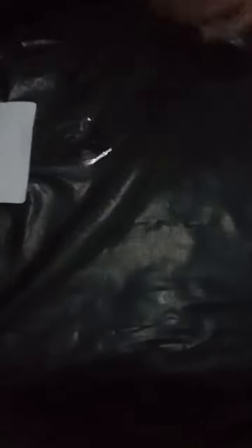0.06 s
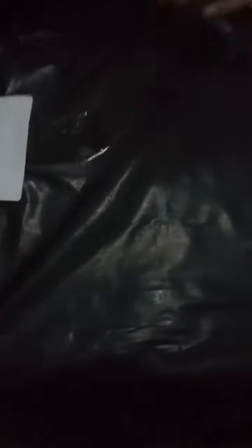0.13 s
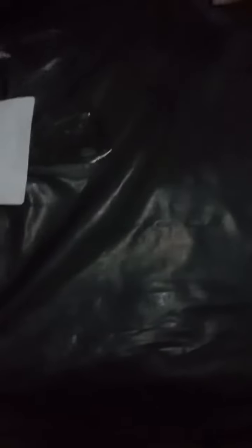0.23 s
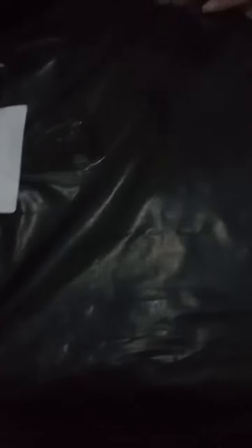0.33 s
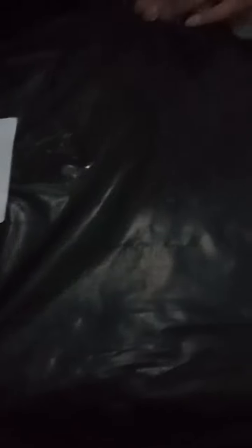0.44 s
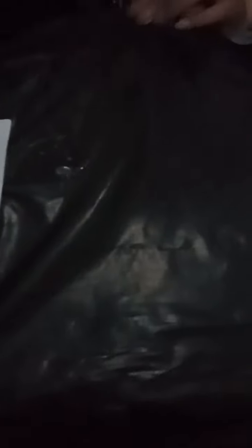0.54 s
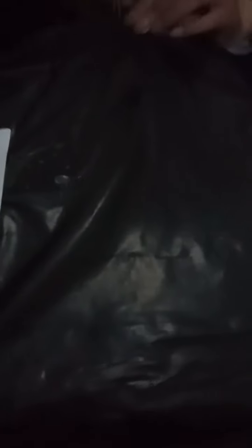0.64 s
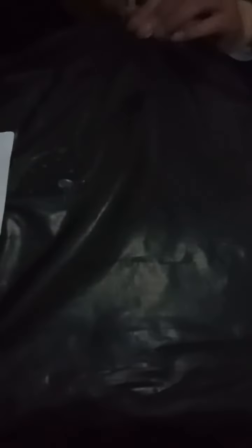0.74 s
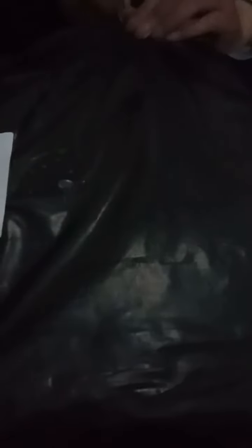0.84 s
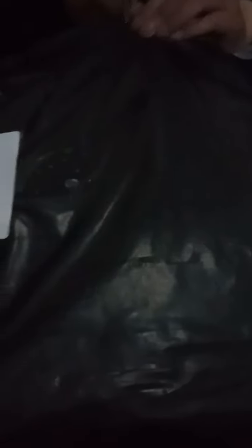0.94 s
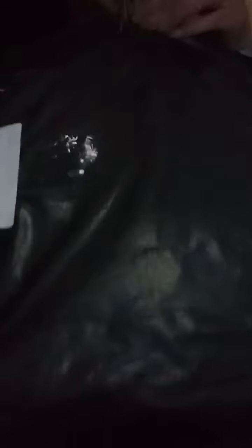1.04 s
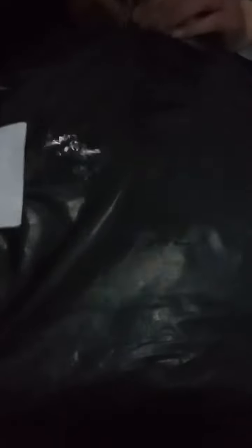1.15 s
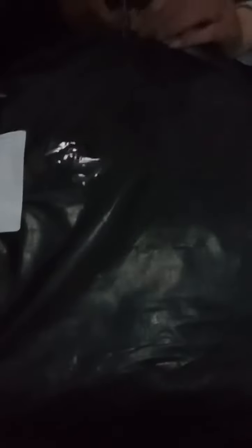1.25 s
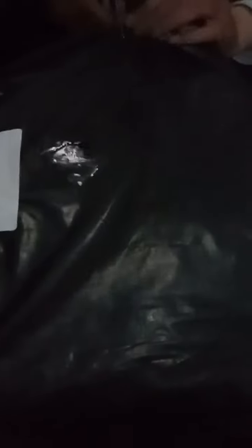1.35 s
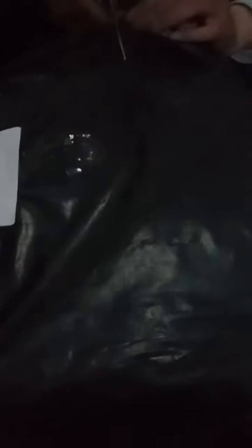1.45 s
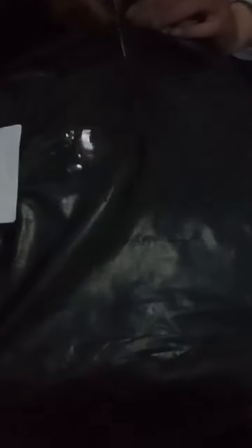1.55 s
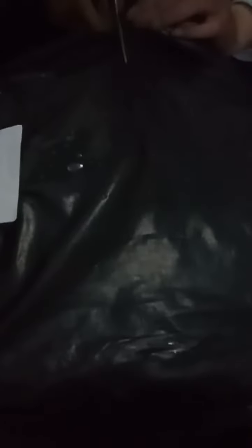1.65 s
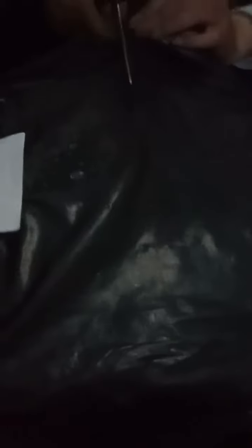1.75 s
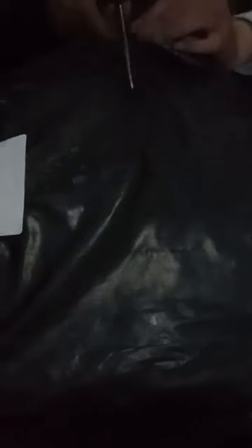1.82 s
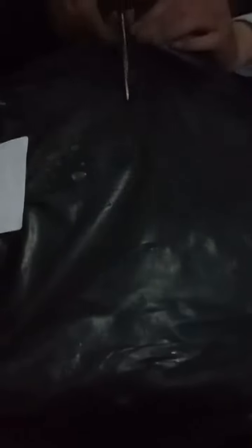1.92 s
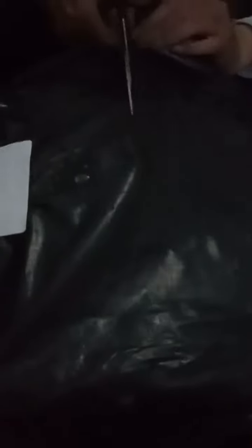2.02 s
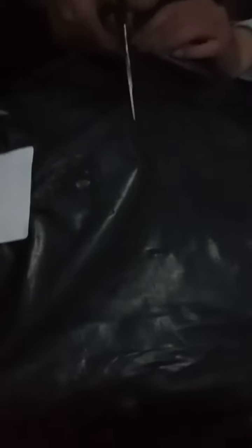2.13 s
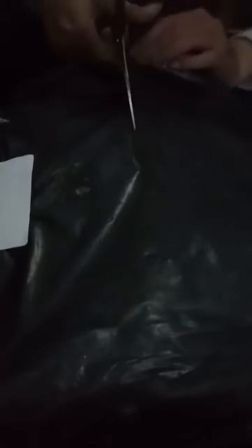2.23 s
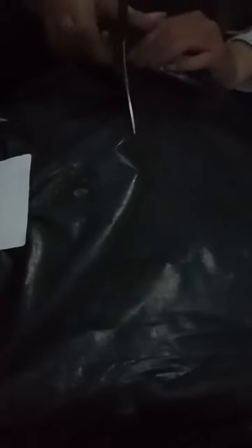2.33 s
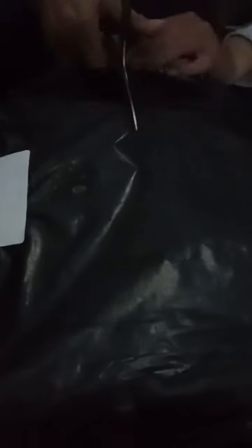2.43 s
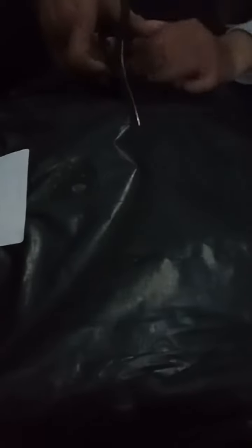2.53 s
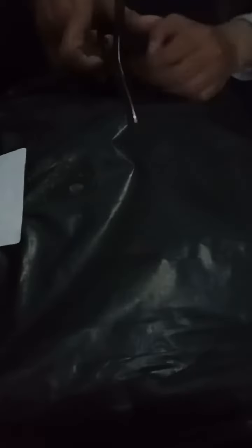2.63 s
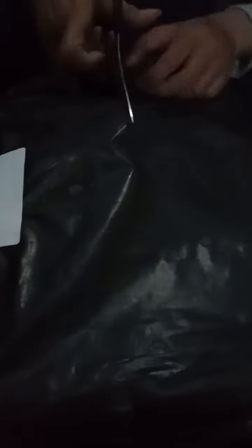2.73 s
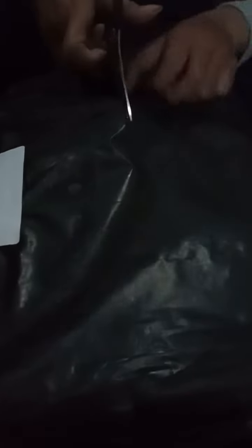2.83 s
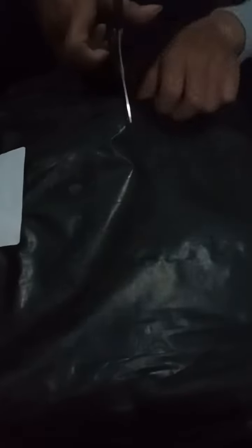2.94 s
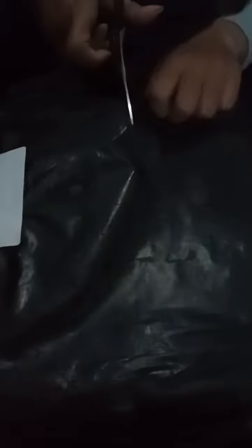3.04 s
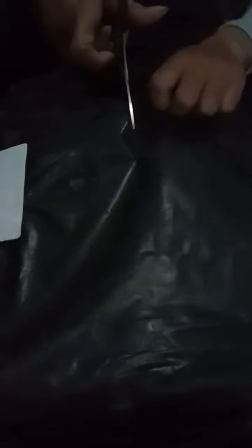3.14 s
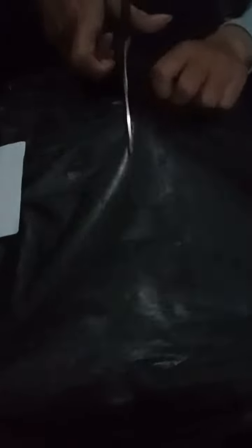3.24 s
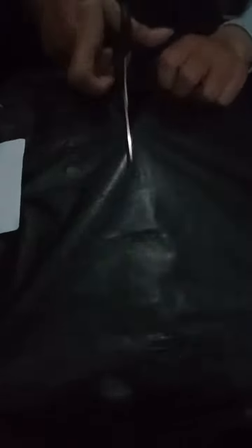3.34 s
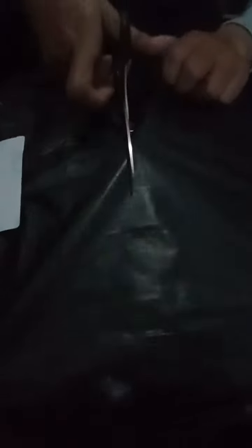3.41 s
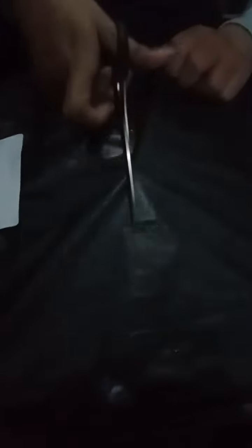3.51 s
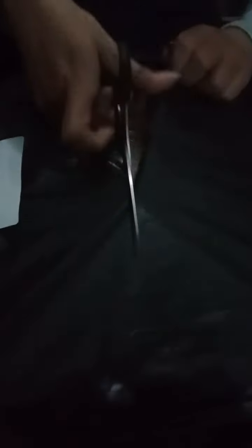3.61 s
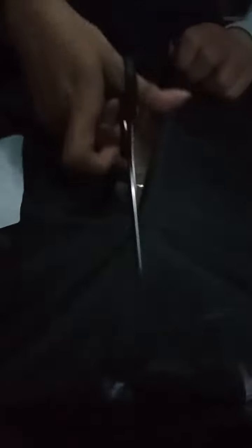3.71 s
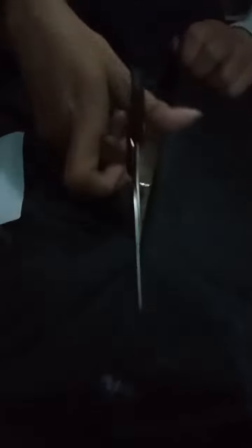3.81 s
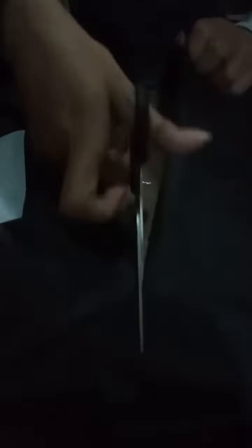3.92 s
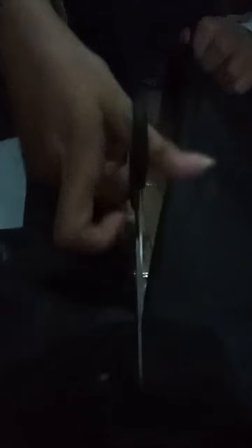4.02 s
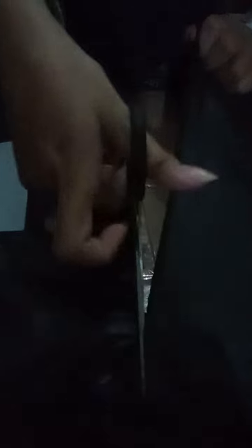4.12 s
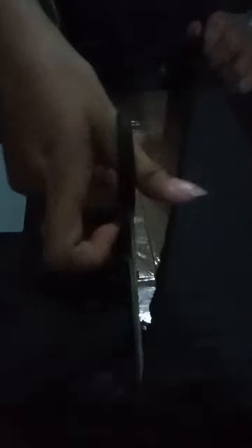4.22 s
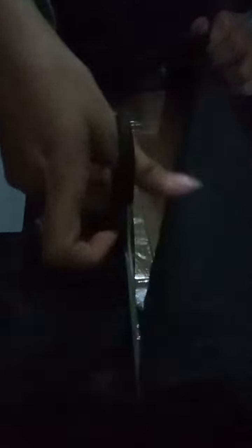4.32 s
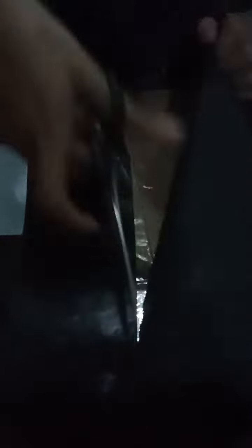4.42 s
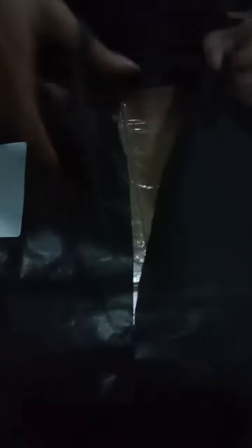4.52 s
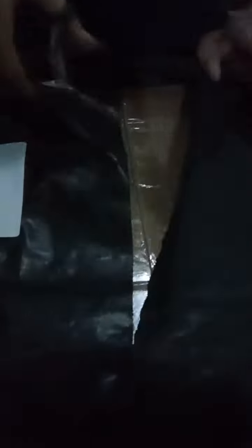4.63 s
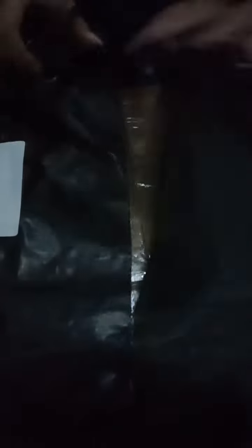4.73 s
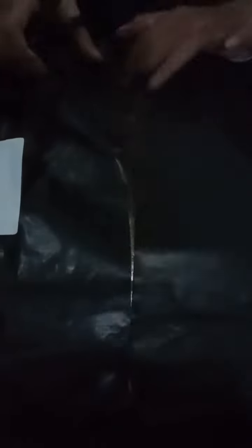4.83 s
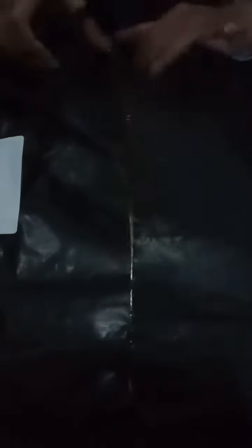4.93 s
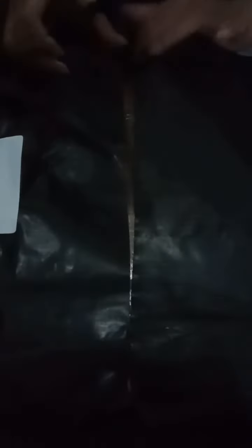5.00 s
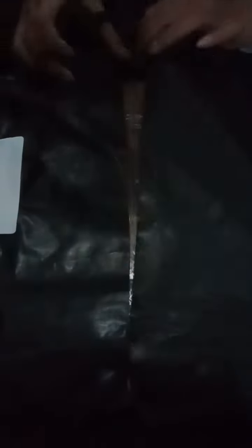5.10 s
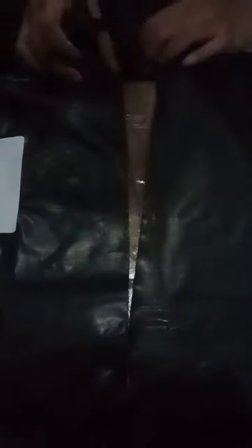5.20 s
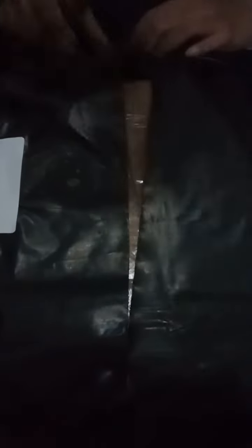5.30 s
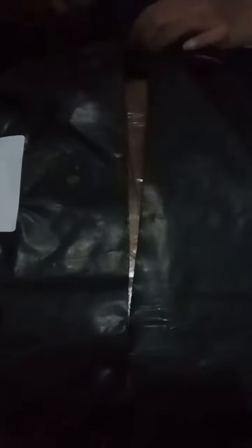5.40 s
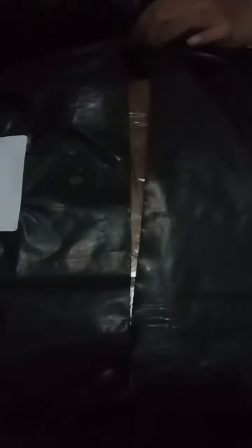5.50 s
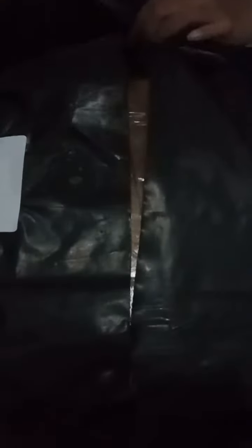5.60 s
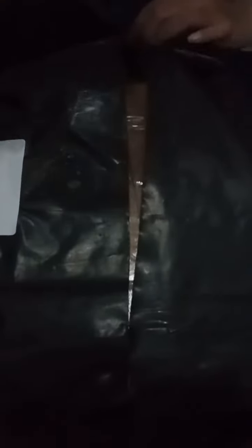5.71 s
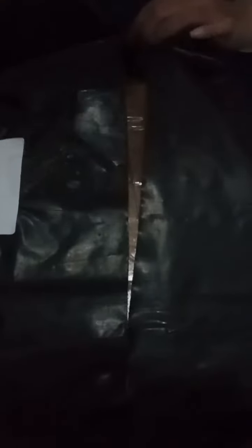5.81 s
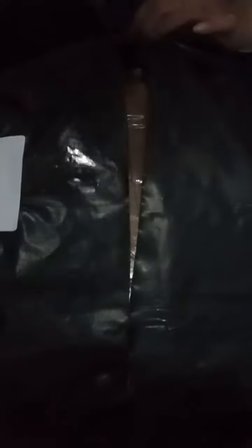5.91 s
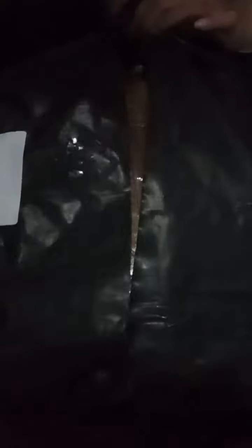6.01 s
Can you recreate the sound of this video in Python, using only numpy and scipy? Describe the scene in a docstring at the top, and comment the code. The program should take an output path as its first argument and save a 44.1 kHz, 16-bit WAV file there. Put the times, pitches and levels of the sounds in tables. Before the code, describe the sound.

Scissors snip and slice through a thin plastic mailer bag, which crinkles and crackles close up in a quiet room.

```python
"""A thin plastic mailer bag crinkles as scissors cut it open, close up in a quiet room.
A few short snips start the cut, the blades zip through the taut film, and the hands pull the slit apart.
Tiny buckles make the crinkle, big creases snap, and the film creaks as it sticks and slips on the blade.
Underneath, panels flex and knock, the parcel rings hollow and the whole bag heaves."""
import sys
import numpy as np
from scipy import signal
from scipy.fft import rfft, irfft
from scipy.io import wavfile
from scipy.ndimage import uniform_filter1d

SR = 44100
rng = np.random.default_rng(int(sys.argv[2]) if len(sys.argv) > 2 else 0)


def unload_audio(sound):
    """Save the sound as a 16-bit wav file, at the path given as the first command line argument."""
    columns = np.transpose(np.atleast_2d(sound))
    # keep every value between -1 and 1, then stretch to whole-number steps
    steps = np.round(np.clip(columns, -1, 1) * 32767)
    wavfile.write(sys.argv[1], SR, steps.astype(np.int16))


N = 267025

# Levels in the tables are set ahead of the faders in scene().
# Pushes, snips and tugs. Each row: start and end in seconds, first and last level in dB, tautness
# (brightness) in dB, then panel flex and bag heave in dB against that level.
STROKES = [(0.0, 0.022, -44.5, -43, 8, -23, -23), (0.037, 0.12, -56.5, -65, 10, -33, -19),
           (0.116, 0.285, -49.5, -42, 1.5, -11, -29), (0.318, 0.442, -58.5, -59.5, 3, -26, -25.5),
           (0.453, 0.567, -48.5, -49, 1, -27, -27.5), (0.575, 0.968, -58, -76.5, 8, -21, -22.5),
           (1.10, 1.195, -35, -34.5, 10, -14, -26), (1.234, 1.313, -53, -58, 4, -11, -26.5),
           (1.438, 1.488, -33.5, -35, 5.5, -10, -24.5), (1.629, 1.82, -61.5, -45, 12.5, -28.5, -30),
           (1.843, 1.9, -41.5, -42.5, 12, -28, -24), (1.934, 2.021, -38.5, -39, 12, -17.5, -28),
           (2.048, 2.119, -40.5, -39, 5.5, -11, -15.5), (2.165, 2.288, -51.5, -58.5, -1, -16.5, -26),
           (2.39, 2.46, -51.5, -41, 4.5, -9, -21), (2.486, 2.513, -35.5, -34.5, 8.5, -19, -31),
           (2.543, 2.701, -33.5, -42, 11.5, -21.5, -26), (2.73, 2.93, -57, -64.5, 8, -26, -23),
           (2.905, 2.976, -46.5, -36, 9.5, -27.5, -23.5), (3.001, 3.12, -47.5, -48.5, 6, -23, -27),
           (3.7, 3.757, -32.5, -29, 13.5, -21.5, -31), (3.776, 3.979, -39.5, -28.5, 9, -13, -26),
           (3.995, 4.09, -32.5, -33, 5.5, -5.5, -9), (4.109, 4.153, -46, -44.5, -0.5, -5, -17),
           (4.187, 4.191, -19.5, -23.5, 7.5, -8, -18), (4.206, 4.238, -36, -36.5, 4, -10.5, -14.5),
           (4.26, 4.337, -47, -43.5, 5, -22, -30), (4.352, 4.40, -35.5, -33.5, 5, -13, -23.5),
           (4.407, 4.437, -27.5, -34, 7.5, -7.5, -15), (4.46, 4.586, -32.5, -38, 7, -18.5, -37.5),
           (4.635, 4.729, -44, -45, 7, -32, -30), (4.764, 4.891, -38, -39.5, 9.5, -20.5, -26.5),
           (4.914, 5.018, -38, -40.5, 7.5, -29.5, -34), (5.045, 5.11, -63.5, -45, 6.5, -29, -31),
           (5.128, 5.215, -34, -33, 10, -14, -31), (5.235, 5.327, -37, -45.5, 6, -23, -24),
           (5.331, 5.451, -42.5, -42, 6, -24, -28), (5.821, 5.968, -56.5, -53, 20, -32.5, -30.5),
           (5.962, 6.049, -44.5, -42, 10.5, -24, -30)]
# The one long push of the blades. Each row: time in seconds, then level, tautness, flex and heave in dB.
LONG_CUT = [(3.13, -43.5, 0.5, -37, -28), (3.27, -36, 9.5, -14.5, -36.5), (3.39, -38.5, 7.5, -25, -32),
            (3.588, -31, 15.5, -25.5, -35.5), (3.692, -37, 17.5, -52, -42)]
# How freely the blades slide. Each row: time in seconds, share from 0 to 1.
GLIDE_SHARE = [(3.1, 0.03), (3.4, 0.62), (3.7, 0.13), (3.95, 0.061)]
# Tone curves of the film, its panels, the bag and the room. Each row: frequency in Hz, gain in dB.
FILM_EQ = [(600, -49), (1000, -15.5), (1230, -9), (1620, -8.5), (1850, -8.5), (2200, -6.5), (2750, -5.5),
           (3620, -3.5), (4960, -7), (6100, -5), (7020, -0.5), (8650, -5), (10200, -8.5), (11700, -16),
           (12800, -12.5), (13900, -21.5), (15300, -15), (16200, -40)]
PANEL_EQ = [(250, -12.5), (430, -3), (520, -11.5), (620, -2), (720, -1), (860, 1), (1020, -1.5),
            (1400, -14.5)]
BAG_EQ = [(25, -21), (50, -15.5), (80, -6), (110, 4), (145, 1.5), (192, 1), (250, -7), (335, -4),
          (420, -11.5), (650, -33.5)]
ROOM_EQ = [(25, -10), (130, 1), (300, -1), (800, -20.5), (1300, -10), (2000, -25.5), (7000, -2.5),
           (15000, -17)]
# The parcel's hollow ring. Each row: pitch in Hz, width of one filter pass in Hz, gain in dB.
PARCEL_MODES = [(1248, 265, -4), (1425, 117, -0.5), (2320, 58, -17), (3630, 170, -22.5), (6900, 260, -19)]
# Big creases flipping. Each row: start in seconds, attack level in dB, pitch in Hz, spread over the
# film in dB against the click.
BIG_SNAPS = [(0.1355, -37, 6850, 3.5), (0.23, -31, 6330, 15), (0.2752, -39, 5400, 10),
             (0.288, -43, 5670, 20), (0.4274, -45, 6150, -14), (0.461, -38, 6400, 2),
             (0.485, -41.5, 5900, -13), (0.5093, -41, 7900, -13), (0.5412, -35.5, 5900, -22),
             (0.55, -34, 7100, -13), (0.5685, -32, 7160, -4), (0.6296, -39, 5200, -16),
             (0.6, -43, 6900, -4), (0.703, -42, 7100, -2), (0.809, -38.5, 5200, -4),
             (0.869, -48.5, 6270, 4), (1.0826, -25.5, 5700, -32), (1.168, -28.5, 6100, -5.5),
             (1.1813, -29.5, 5700, 2), (1.1955, -25, 5750, 7), (1.2818, -42, 7200, -27),
             (1.3019, -36.5, 6130, 15), (1.3188, -43, 4060, 9), (1.4365, -34, 5530, 7),
             (1.4465, -26.5, 6430, 2), (1.4843, -31, 7460, -8), (1.496, -31.5, 6450, 1),
             (1.7768, -33.5, 7240, -9), (1.86, -30.5, 7900, -19), (1.936, -23.5, 7600, 0),
             (2.0516, -28.5, 5630, 8), (2.0958, -29.5, 4700, -3), (2.1076, -29, 5530, 5),
             (2.3823, -41, 4700, -10), (2.4921, -26.5, 7240, 23), (2.579, -30.5, 6200, 16),
             (2.7071, -29, 6630, 0), (2.767, -39, 4950, 23), (2.9693, -33, 4900, -6),
             (3.0288, -30, 4830, 8), (3.1245, -30, 6600, 10), (3.2616, -30, 6340, 0),
             (3.3467, -22, 7400, -3), (3.712, -23, 8100, -5.5), (3.7606, -18.5, 7180, -15),
             (3.7774, -25, 5450, -4), (3.8, -24.5, 5860, 27), (3.8706, -19, 4900, 13),
             (3.8908, -23.5, 6300, 12), (3.975, -22.5, 6300, -3.5), (3.9865, -22, 6100, -7),
             (3.9926, -20.5, 7200, 18), (4.0218, -21.5, 6950, 11), (4.0515, -23.5, 7300, -6),
             (4.0821, -21.5, 6600, -2), (4.1835, -27.5, 6500, 22), (4.1935, -15.5, 7300, 12.5),
             (4.278, -34, 6700, -6), (4.3358, -27.5, 6160, -1.5), (4.3562, -24.5, 3680, -9),
             (4.3677, -25, 8400, 16.5), (4.386, -24, 5550, 6), (4.4018, -20.5, 6440, -3.5),
             (4.4115, -20.5, 6100, 10), (4.429, -19.5, 6800, 16), (4.5104, -24.5, 5040, 0),
             (4.5484, -24.5, 5640, -21), (4.6654, -24.5, 7100, -27), (4.7466, -27, 6060, 33),
             (4.8719, -28.5, 6800, 3), (4.9985, -30.5, 7400, 26), (5.1446, -27.5, 4400, 11),
             (5.1879, -23, 6400, 5), (5.3753, -30.5, 6900, 6), (5.3992, -32, 5400, 19),
             (5.4347, -25.5, 5850, 6), (5.4834, -40.5, 5100, 18), (5.5249, -51, 7120, -6),
             (5.6538, -56.5, 6800, 1), (5.8257, -46.5, 5700, 0), (6.012, -29, 7850, 24)]
# Taut panels popping. Each row: start in seconds, pitch in Hz, seconds to fall 60 dB, level in dB.
PANEL_KNOCKS = [(1.0803, 209, 0.02, -36), (1.258, 615, 0.28, -71), (1.935, 145, 0.036, -40),
                (2.053, 690, 0.11, -55), (2.203, 830, 0.19, -64), (2.507, 160, 0.42, -58.5),
                (2.697, 1180, 0.057, -48), (3.435, 1437, 0.011, -31), (4.146, 662, 0.019, -33),
                (4.3377, 1496, 0.02, -32.5), (4.4146, 183, 0.047, -36.5), (4.4116, 576, 0.034, -34),
                (4.948, 1455, 0.019, -34.5), (5.436, 1480, 0.042, -40.5)]
# Film catching on the blade. Each row: start and end in seconds, first and last rate in slips per
# second, tick pitch in Hz, panel pitch in Hz, attack level in dB.
BLADE_CREAKS = [(2.181, 2.224, 165, 210, 2700, 810, -52.5), (2.395, 2.447, 142, 240, 3580, 700, -39.5),
                (3.414, 3.438, 110, 150, 2103, 640, -43.5)]
# The zip of the gliding blades. Each row: time in seconds, pitch in Hz, level in dB.
ZIP_PATH = [(3.279, 7480, -72), (3.321, 7470, -33), (3.39, 7420, -48), (3.46, 9030, -37), (3.53, 8240, -38),
            (3.57, 6860, -27.5), (3.63, 7200, -52), (3.702, 8170, -33), (3.76, 7540, -56)]

# Heavier parts lag more. Each envelope: rise and fall in dB per second, lag in seconds.
FILM_ENVELOPE, PANEL_ENVELOPE, BAG_ENVELOPE = (3500, 543, 0.0005), (2200, 650, 0.002), (2700, 560, 0.0059)
# The film stirs faintly just before a stroke and settles after it.
SETTLE_DB, STIR_DB_PER_S, SETTLE_DB_PER_S = -17, 1097.5, 292
RUMBLE_CUT_HZ, TOP_CUT_HZ = 22, 15900


def from_db(db):
    """Decibels to gain."""
    return 10 ** (np.asarray(db) / 20)


def rms_one(x):
    """Scale to rms 1."""
    return x / np.sqrt(np.mean(x ** 2) + 1e-20)


def in_time(rows):
    """Draw an automation curve through rows of time in seconds and value."""
    return np.interp(np.arange(N) / SR, *np.transpose(rows))


def add(out, s, sound):
    """Drop a short sound in at s seconds."""
    at = int(np.clip(round(s * SR), 0, N - 1))
    out[at:at + len(sound)] += sound[:N - at]


def set_attack(hit, db):
    """Set a hit's level by its first 3 ms."""
    return from_db(db) * hit / np.std(hit[:3 * SR // 1000])


def response(eq, size=1024):
    """Minimum-phase impulse response of a tone curve."""
    hz, db = np.transpose(eq)
    grid_hz = np.maximum(np.arange(size // 2 + 1) * SR / size, 1)
    gain = from_db(np.interp(np.log(grid_hz), np.log(hz), db))
    cepstrum = irfft(np.log(gain))
    fold = np.r_[1, np.full(size // 2 - 1, 2), np.zeros(size // 2)]
    return irfft(np.exp(rfft(cepstrum * fold)))[:size // 2]


def colour(x, impulse):
    """Pass a sound through an impulse response."""
    return signal.fftconvolve(x, impulse)[:len(x)]


def resonate(x, hz, width_hz):
    """Two-pole resonance with unity gain at its peak."""
    r = np.exp(-np.pi * width_hz / SR)
    poles = [1, -2 * r * np.cos(2 * np.pi * hz / SR), r * r]
    return signal.lfilter(np.array([1, 0, -1]) * (1 - r * r) / 2, poles, x + 1e-18)


def even(x, span_s):
    """Ride the level steady over span_s, leaving the finer grain."""
    power = np.maximum(uniform_filter1d(x * x, max(int(span_s * SR), 2)), 0)
    return x / np.sqrt(power + 1e-4 * np.mean(x * x))


def bend(x, stages=10):
    """Bending waves carry highs faster than lows, so a click reaches the edge as a tiny chirp."""
    return signal.sosfilt(np.tile([-.5, 0.97, -0.00031, 1, -0.51, -0.012], (stages, 1)), x)


def scatter(near_db, near_s, far_db, far_s, size=3072):
    """A click with two tails: its spread over the film (near) and its reflections (far)."""
    t = np.arange(size) / SR
    near = from_db(near_db) * rms_one(rng.standard_normal(size) * np.exp(-t / near_s))
    far = from_db(far_db) * rms_one(rng.standard_normal(size) * np.exp(-t / far_s))
    return (t == 0) + (near + far) / np.sqrt(size)


def grains(per_s, spread_db, low_hz, high_hz, q, bands=14):
    """Random clicks of uneven size, each ringing briefly in one of many bands."""
    onsets = np.flatnonzero(rng.random(N) < per_s / SR)
    size, sign, pitch = rng.random((3, N))[:, onsets]
    strength = from_db(spread_db * np.minimum(-np.log(1 - size), 4)) * np.sign(sign - .5)
    out = np.zeros(N)
    for band, hz in enumerate(np.geomspace(low_hz, high_hz, bands)):
        clicks = np.zeros(N)
        clicks[onsets] = strength * ((pitch * bands).astype(int) == band)
        out += resonate(clicks, hz, hz / q)
    return out


def gesture_power(t, s, db, envelope):
    """One move of the hand grabs fast, follows its level curve, then falls away and settles."""
    rise, fall, lag_s = envelope
    t = t - lag_s
    before, after = np.maximum(s[0] - t, 0), np.maximum(t - s[-1], 0)
    settle_db = SETTLE_DB - STIR_DB_PER_S * before - SETTLE_DB_PER_S * after
    edge_db = np.maximum(-rise * before - fall * after, settle_db)
    return from_db(np.maximum(np.interp(t, s, db) + edge_db, -130)) ** 2


def handling():
    """The hands' moves sum to four automation curves in dB: crinkle, tautness, flex and heave."""
    t = np.arange(0, N, 32) / SR
    gestures = [[(start, first, *tone), (end, last, *tone)] for start, end, first, last, *tone in STROKES]
    work = taut = flex = heave = 0
    for s, db, taut_db, flex_db, heave_db in map(np.transpose, gestures + [LONG_CUT]):
        power = gesture_power(t, s, db, FILM_ENVELOPE)
        work += power
        taut += power * np.interp(t, s, taut_db)
        flex += gesture_power(t, s, db + flex_db, PANEL_ENVELOPE)
        heave += gesture_power(t, s, db + heave_db, BAG_ENVELOPE)
    curves = 10 * np.log10(work), taut / work, 10 * np.log10(flex), 10 * np.log10(heave)
    return [in_time(np.c_[t, db]) for db in curves]


def room_tone():
    """A faint, steady bed of hiss."""
    return rms_one(colour(rng.standard_normal(N), response(ROOM_EQ, size=4096)))


def crinkle(level_db, taut_db):
    """Harder-worked film buckles more densely; under gliding blades the buckles merge into a hiss."""
    gliding = in_time(GLIDE_SHARE)
    per_s = 350 + 1500 * from_db(.5 * (level_db + 39.5) + 14 * gliding)
    ticks = grains(per_s, spread_db=5.5, low_hz=1050, high_hz=15000, q=2.1)
    # whole facets flip and ring at pitches of their own
    pings = grains(.4 * per_s, spread_db=2.5, low_hz=1227, high_hz=10700, q=8.3, bands=72)
    buckles = rms_one(ticks) + from_db(-5.0) * rms_one(pings)
    # each buckle spreads over the film and comes back from its edges
    buckles = colour(buckles, scatter(near_db=-13.5, near_s=0.0027, far_db=-5.5, far_s=0.0033))
    shear = from_db(-12.5 + 13 * gliding) * rng.standard_normal(N)
    film = colour(even(buckles, span_s=0.069) + shear, bend(response(FILM_EQ)))
    mids = signal.sosfiltfilt(signal.butter(2, 5000, fs=SR, output="sos"), film)
    treble = film - mids
    tilt = from_db((taut_db - 10.5) / 2)  # tauter is brighter
    return from_db(level_db - 1.9 * gliding) * even(mids / tilt + treble * tilt, span_s=0.019)


def panel_flex(flex_db):
    """Larger areas of film flip with duller, longer knocks."""
    flips = grains(per_s=380, spread_db=3, low_hz=389, high_hz=1183, q=25)
    return from_db(flex_db) * even(colour(flips, response(PANEL_EQ)), span_s=0.022)


def bag_heave(heave_db):
    """Soft bumps of the hands and scissors move the air in the bag."""
    bumps = grains(per_s=500, spread_db=1.0, low_hz=54.7, high_hz=442, q=5.7, bands=32)
    return from_db(heave_db) * even(colour(bumps, response(BAG_EQ, size=8192)), span_s=0.085)


def parcel_ring(film, level_db):
    """The parcel rings along with the film, most freely while the hands hold it lightly."""
    free_db = np.clip(-.3 * (level_db + 43), -3, 7)
    drive = from_db(free_db) * film
    return sum(from_db(db) * resonate(resonate(drive, hz, width_hz), hz, width_hz)
               for hz, width_hz, db in PARCEL_MODES)


def small_snaps(level_db, count=56, over_db=9.5, vary_db=4.5, ceiling_db=-29.5, centre_hz=6500):
    """Small creases give way at random, poking above the crinkle; rows as in BIG_SNAPS."""
    when, size, pitch, spread = rng.random((count, 4)).T
    db = level_db[(when * N).astype(int)] + over_db + vary_db * (2 * size - 1)
    db = np.minimum(db, ceiling_db)
    return list(zip(when * N / SR, db, centre_hz * 2 ** (pitch - .5), 16 * (spread - .5)))


def crease_snaps(level_db):
    """Each crease flips with one click, rings at its own pitch and spreads over the film."""
    out, film = np.zeros(N), bend(response(FILM_EQ))
    for s, db, hz, spread_db in list(BIG_SNAPS) + small_snaps(level_db):
        click = scatter(near_db=spread_db, near_s=0.0024, far_db=-13.5, far_s=.009)
        crease = resonate(click, hz, hz / 1.1)
        # the facets beside the crease add a thin ring
        facet = resonate(click, hz * 2 ** rng.uniform(-1.2, 0.45), width_hz=380)
        snap = colour(crease + from_db(-9.0) * facet + from_db(-12) * click, film)
        add(out, s, set_attack(snap, db))
    return out


def panel_knocks():
    """A taut panel pops over within a cycle and rings down at one pitch."""
    out, t = np.zeros(N), np.arange(SR // 3) / SR
    for s, hz, t60, db in PANEL_KNOCKS:
        envelope = np.minimum(hz * t, 1) * from_db(db - 60 * t / t60)
        add(out, s, envelope * np.sin(2 * np.pi * hz * t))
    return out


def blade_creaks():
    """Slips come faster as the blade presses on; each one ticks the film and rings a panel."""
    out, film = np.zeros(N), response(FILM_EQ)
    for start, end, first_rate, last_rate, tick_hz, panel_hz, db in BLADE_CREAKS:
        s = start
        while s < end:
            click = scatter(near_db=0.5, near_s=0.00033, far_db=-34.5, far_s=.008)
            tick = colour(resonate(click, tick_hz, tick_hz / 5) + from_db(-31) * click, film)
            ring = resonate(resonate(click, panel_hz, 170), panel_hz, 170)
            slip = rms_one(tick) + from_db(-8.0) * rms_one(ring)
            add(out, s, set_attack(slip, db))
            jitter = np.exp(0.074 * rng.standard_normal())
            s += jitter / np.interp(s, [start, end], [first_rate, last_rate])
    return out


def blade_zip():
    """The film just ahead of the blades sings in a narrow band that wanders with its tension."""
    hz = in_time([(s, hz) for s, hz, db in ZIP_PATH])
    db = in_time([(s, db) for s, hz, db in ZIP_PATH])
    t = np.arange(N) / SR
    cutting = (t > ZIP_PATH[0][0]) & (t < ZIP_PATH[-1][0])
    noise = signal.sosfilt(signal.butter(2, 550, fs=SR, output="sos"), rng.standard_normal((2, N)))
    phase = 2 * np.pi * np.cumsum(hz) / SR
    band = noise[0] * np.cos(phase) + noise[1] * np.sin(phase)  # low noise shifted up to the pitch
    return cutting * from_db(db) * rms_one(band)


def scene():
    """The mono mix: crisp film and the zip on top, the bag's body below, room tone behind."""
    room = from_db(-86.5) * room_tone()
    level_db, taut_db, flex_db, heave_db = handling()
    body = (from_db(-3.0) * panel_flex(flex_db)
            + from_db(-1.2) * bag_heave(heave_db)
            + from_db(7.5) * panel_knocks())
    zipping = from_db(-1) * blade_zip()
    film = (from_db(2.03) * crease_snaps(level_db)
            + from_db(0.83) * crinkle(level_db, taut_db)
            + from_db(-1.0) * blade_creaks())
    return (film + parcel_ring(film, level_db) + zipping + body + room)[None]


def record(dry):
    """The microphone drops the deep bass; the top is cut steeply."""
    lean = signal.sosfilt(signal.butter(2, RUMBLE_CUT_HZ, "high", fs=SR, output="sos"), dry)
    return signal.sosfilt(signal.ellip(10, .2, 70, TOP_CUT_HZ, fs=SR, output="sos"), lean)


dry = scene()
out = record(dry)
unload_audio(out)
```